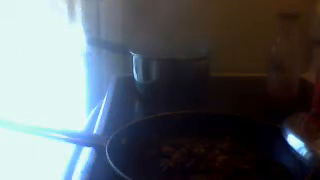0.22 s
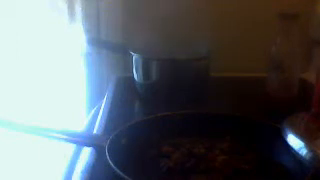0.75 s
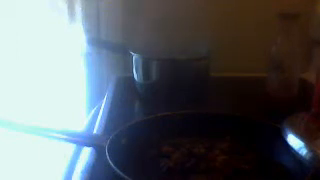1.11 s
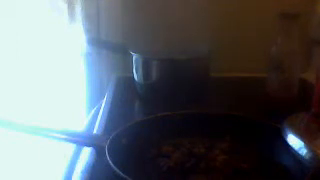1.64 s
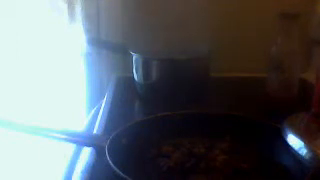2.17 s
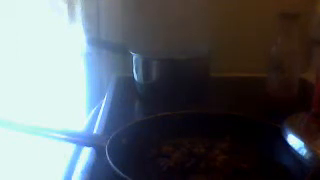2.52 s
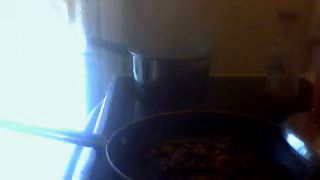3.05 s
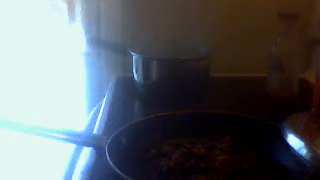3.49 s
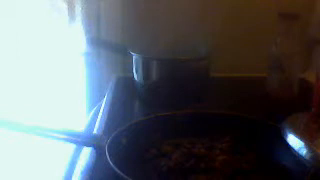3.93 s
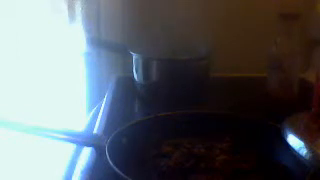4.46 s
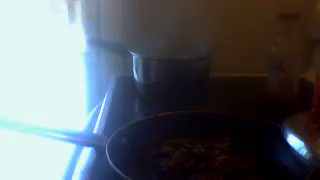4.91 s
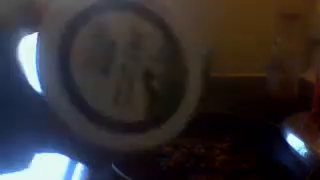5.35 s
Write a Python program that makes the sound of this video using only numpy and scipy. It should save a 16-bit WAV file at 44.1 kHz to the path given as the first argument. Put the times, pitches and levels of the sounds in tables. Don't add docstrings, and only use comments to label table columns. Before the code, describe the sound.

Loud close pot clunk at once, faint pan ringing, steady kitchen fan hum with faint fat spits, later a tub knock and low thump.

```python
import sys
import numpy as np
from scipy import signal
from scipy.fft import rfft, irfft, next_fast_len
from scipy.io import wavfile
from scipy.ndimage import uniform_filter1d

SR = 44100
rng = np.random.default_rng(int(sys.argv[2]) if len(sys.argv) > 2 else 0)


def how_loud(loudness_db):
    steps = np.asarray(loudness_db, float) / 20
    return 10 ** steps


def generate_wav(sig):
    pcm = np.round(np.clip(np.atleast_2d(sig).T, -1, 1) * 32767).astype(np.int16)
    wavfile.write(sys.argv[1], SR, pcm)


N = 245637
T = np.arange(N) / SR
F = np.maximum(np.arange(N // 2 + 1) * SR / N, 1)


def curve(table):
    hz, db = np.transpose(table)
    return np.interp(np.log(F), np.log(hz), db)


def humps(table):
    return sum(how_loud(db) ** 2 / (1 + ((F - hz) / (width / 2)) ** 2) ** 2 for hz, width, db in table)


def noise(power):
    white = rfft(rng.standard_normal(N))
    return irfft(white * np.sqrt(power * SR / 2), N)


def one_second_power(power):
    return power / power.sum() * N / SR


def unit(x):
    return x / np.std(x)


def walk(rate_hz):
    return unit(noise(1 / (1 + (F / rate_hz) ** 4)))


def ring(force, hz, t60):
    pole = np.exp((2j * np.pi * hz - np.log(1000) / t60) / SR)
    return signal.lfilter([1], [1, -pole], force)


def push(start_s, size, rise_s):
    shape = np.sin(np.pi * np.clip((T - start_s) / rise_s, 0, 1)) ** 2
    return size * shape / shape.sum()


def fan_hum():
    # pitch_hz, level_db (rms), wander_db
    tones = [(119.8, -46, .8), (177.6, -49, 1), (360, -61, 2), (532.9, -52, 1.5), (640.6, -61, 3),
             (710.6, -61, 2), (760, -67, 3), (35.3, -66, 2)]
    hum = 0
    for hz, db, wander_db in tones:
        level = np.sqrt(2) * how_loud(db + wander_db * walk(3.4))
        phase = 2 * np.pi * (hz * T + rng.random()) + 0.11 * wander_db * walk(2.3)
        hum = hum + level * np.sin(phase)
    return hum


def fan_air():
    # pitch_hz, level_db (per Hz)
    air = [(15, -83.5), (30, -79.5), (60, -77.5), (210, -77), (420, -82), (680, -82), (900, -84),
           (1250, -88.5), (2200, -88.5), (3300, -95), (5000, -95), (6300, -94.5), (12000, -95)]
    # pitch_hz, width_hz, level_db (per Hz)
    hood = [(134.5, 46, -66.5), (191, 20, -70), (283.6, 20.3, -70), (359.4, 65, -72.5), (464, 42, -73),
            (504, 15.3, -64.5), (518, 13, -64), (537, 14, -75.5), (580, 95, -72), (733, 40, -78),
            (864, 27, -78), (1003, 40, -81.5), (1746, 620, -84), (2680, 630, -91), (3900, 750, -94),
            (5750, 700, -100)]
    power = how_loud(curve(air)) ** 2 + humps(hood)
    gust = walk(2.2)
    octave = np.clip(np.round(np.log2(F / 30)), 0, 8)
    return sum(how_loud(0.24 * gust + 0.6 * walk(17)) * noise(power * (octave == k)) for k in range(9))


def sizzle():
    # start_s, peak_db
    spits = [(0.7404, -42), (1.7634, -42), (2.471, -44.5), (2.5945, -46), (3.2515, -38), (3.3353, -37)]
    pops_per_s, bed_db, spread_db = 260, -71, 4.0
    popping = rng.random(N) < pops_per_s / SR
    size = how_loud(bed_db + spread_db * rng.exponential(size=N))
    pops = popping * size * rng.choice([-1, 1], N)
    bed = ring(pops, 4200, 0.0031).imag + ring(pops, 1900, 0.006).imag
    clear = sum(ring(push(s, how_loud(peak_db - 3.5), 0.0001), 4500, 0.0035).imag for s, peak_db in spits)
    return bed + clear


def pan_ring():
    # pitch_hz, level_db, t60_s, beats_per_s, first_swell_s, beat_depth (0-1)
    pan = (1580, -51.5, 6, 2.9, .36, .75)
    hz, db, t60, beats, swell_s, depth = pan
    beat = 1 + depth * np.cos(2 * np.pi * beats * (T - swell_s))
    return ring(push(0.01, how_loud(db), 0.00032), hz, t60).imag * beat


def hand_rumble():
    arrive_s, arrival_s, away_db, busy_db = 3.76, 0.25, -67.5, -49
    near = np.clip((T - arrive_s) / arrival_s, 0, 1)
    return unit(noise(humps([(24, 20, 0)]))) * how_loud(away_db + (busy_db - away_db) * near)


def worktop():
    # start_s, level_db, direction, rise_s
    jolts = [
        (4.1522, -10, -1, 0.0063),
        (4.1631, -16, -1, 0.0019),
        (4.1654, -9, 1, 0.0035),
        (4.195, -21.5, -1, 0.0013),
        (4.198, -20, 1, 0.0068),
    ]
    # start_s, level_db, direction
    nudges = [
        (3.09, -33, 1),
        (3.945, -28, -1),
        (4.225, -33, 1),
        (4.445, -38, 1),
        (4.742, -24, -1),
        (5.27, -26.5, -1),
    ]
    # start_s, level_db,
    # direction, rise_s
    wobbles = [(4.262 + k * 0.04, -28.5 - k * 3, -1, 0.016) for k in range(3)]
    nudge = sum(push(s, np.sign(way) * how_loud(db), 0.019) for s, db, way in nudges)
    jolt = sum(push(s, np.sign(way) * how_loud(db), rise_s) for s, db, way, rise_s in jolts + wobbles)
    force = how_loud(-4) * nudge + jolt
    rock = ring(force, 22.7, 0.2).real
    board = how_loud(-7.5) * ring(force, 106.6, 0.044).real
    flex = how_loud(-4) * ring(nudge, 40, 0.13).real
    return rock + board + flex


def tub_taps():
    # start_s, peak_db, pitch_hz
    taps = [(4.157, -25, 470), (4.158, -26, 1280), (4.162, -28, 1880), (4.1595, -28, 2700),
            (4.161, -31, 4500), (4.163, -32, 5800), (4.1945, -21, 350), (4.3575, -42, 2750),
            (4.361, -42, 2200), (4.3695, -32, 720), (4.3725, -31, 1680)]
    t60_s = 0.033
    return sum(ring(push(s, how_loud(db - 2.5), 0.35 / hz), hz, t60_s).imag for s, db, hz in taps)


def tub_knocks():
    # start_s, level_db, contact_s, kind
    knocks = [(3.1, -48, .01, "dull"), (4.107, -40.5, 0.015, "dull"), (4.153, -25.5, 0.0049, "hard"),
              (4.156, -35, .012, "tick"), (4.165, -27, 0.0066, "dull"), (4.171, -41.5, .006, "tick"),
              (4.189, -35, .006, "dull"), (4.258, -47, 0.022, "dull"), (4.335, -55, 0.014, "tick"),
              (4.358, -41, .012, "hard"), (4.37, -46.5, .008, "dull"), (4.52, -51, 0.038, "scuff"),
              (5.15, -56, 0.045, "scuff")]
    contacts = {"dull": (250, 3300, .13), "hard": (440, 3000, 0.15), "tick": (3900, 7200, 0.07),
                "scuff": (1400, 8500, .12)}
    # pitch_hz, width_hz, level_db
    walls = [(120, 75, 7), (253, 58, 13.5), (413, 94, 8.5), (499, 170, 7.5), (780, 270, 0.5),
             (1180, 720, -1.5), (1700, 880, -5.5), (2520, 400, -7.5), (3820, 1200, -11.5),
             (5580, 1600, -11), (8400, 1600, -11.5)]
    out = 0
    for start_s, db, contact_s, kind in knocks:
        low_hz, top_hz, t60 = contacts[kind]
        power = humps(walls) / (1 + (low_hz / F) ** 4) / (1 + (F / top_hz) ** 6)
        power = one_second_power(power)
        age = np.maximum(T - start_s, 0)
        onset = np.clip(age / 0.0026, 0, 1)
        for share, decay_s in ((F < 2000, t60), (F >= 2000, 0.7 * t60)):
            tail = how_loud(-60 * np.maximum(age - contact_s, 0) / decay_s)
            out = out + how_loud(db) * onset * tail * noise(power * share)
    return out


def pot_clatter():
    # pitch_hz, level_db (per Hz)
    colour = [(35, -30), (60, -10), (422, -5), (642, -19.5), (752, -5.5), (831, -14.5), (918, -15.5),
              (2690, -24.5), (7000, -53.5), (9100, -91), (15400, -120)]
    dulling_db_s = 250
    level_db, fade_db_s = -14, 198
    rests_s, resting_fade_db_s = 0.065, 195
    power = one_second_power(how_loud(curve(colour)) ** 2)
    half_octave = np.clip(np.round(2 * np.log2(F / 1500)), 0, 7)
    rattle = sum(noise(power * (half_octave == k)) * how_loud(k * (2.0 - dulling_db_s * T / 2)) for k in range(8))
    return rattle * how_loud(level_db - fade_db_s * T - resting_fade_db_s * np.maximum(T - rests_s, 0))


def pot_body():
    # start_s, level_db
    blows = [
        (0.0005, -11.5),
        (0.0045, -0.5),
        (0.020, -20.5),
        (0.030, -11.5),
        (0.041, -8.5),
        (0.056, -18),
        (0.074, -23.5),
    ]
    # pitch_hz, level_db, t60_s
    modes = [(89.7, -5.5, 0.12), (196.5, -6, 0.088), (250, -13, 0.037), (347, -2, 0.078), (404, 0, 0.064),
             (500, -4, 0.05), (553, -5.5, 0.044), (726, -15.5, 0.033), (790, -18, .06), (928, -10.5, 0.056),
             (1147, -17.5, 0.077), (1340, -18.5, 0.06), (1804, -19, .06)]
    spread = rng.standard_normal((len(blows), len(modes)))
    body = 0
    for k, (hz, db, t60) in enumerate(modes):
        force = 0
        for j, (start_s, blow_db) in enumerate(blows):
            force = force + push(start_s, how_loud(blow_db + db - 6 + 3.5 * spread[j, k]), 0.0006)
        body = body + (-1) ** k * ring(force, hz, t60).imag
    return body


def scene():
    background = fan_hum() + fan_air() + sizzle() + pan_ring()
    handling = hand_rumble() + worktop() + tub_taps() + tub_knocks()
    return (background + handling + pot_clatter() + pot_body())[None]


def band(x, low_hz, top_hz):
    size = next_fast_len(N + SR // 4)
    hz = np.arange(size // 2 + 1) * SR / size
    return irfft(rfft(x, size) * ((hz >= low_hz) & (hz < top_hz)), size)[:N]


def coarse_treble(x):
    # lower_edge_hz, level_db
    steps = [(6330, -2.5), (7160, -15), (8220, -31), (9400, -41.5), (10680, -45)]
    edges = [hz for hz, db in steps] + [12000]
    out = band(x, 0, edges[0])
    flutter_db = 1.2 * walk(25)
    for (hz, db), top_hz in zip(steps, edges[1:]):
        power = uniform_filter1d(band(x, hz, top_hz) ** 2, size=900, origin=-150)
        level = np.sqrt(np.abs(uniform_filter1d(power, size=400)))
        hiss = unit(noise((F >= hz) & (F < top_hz)))
        out = out + how_loud(db + flutter_db * (hz > edges[0])) * level * hiss
    return out


def band_limit(x):
    return signal.sosfilt(signal.butter(12, 10400, fs=SR, output="sos"), x)


def record(dry):
    overload = 0.74
    dry = dry / (1 + (dry / overload) ** 4) ** 0.25
    mix = coarse_treble(dry[0])[None]
    return band_limit(mix)


dry = scene()
out = record(dry)
generate_wav(out)
```